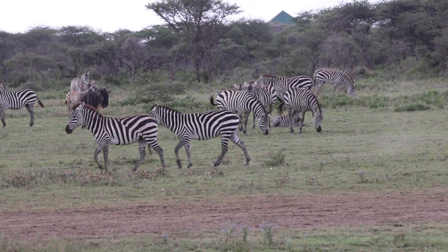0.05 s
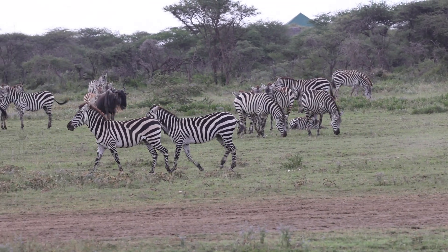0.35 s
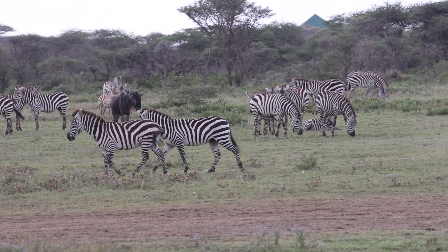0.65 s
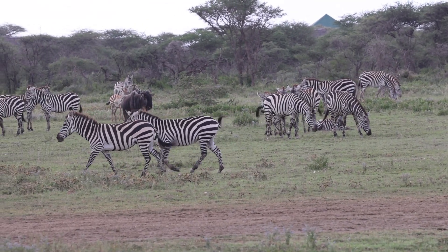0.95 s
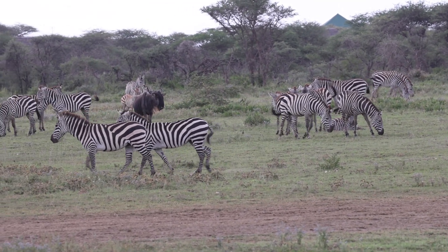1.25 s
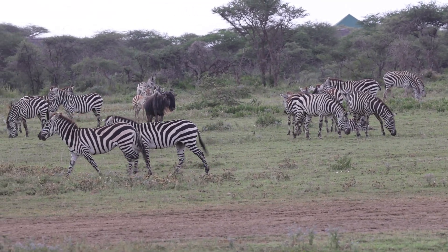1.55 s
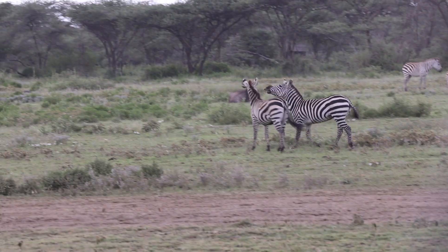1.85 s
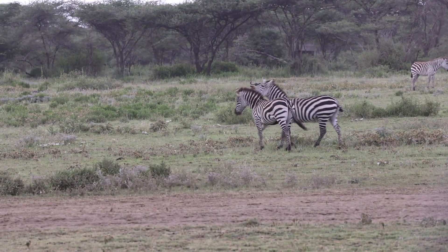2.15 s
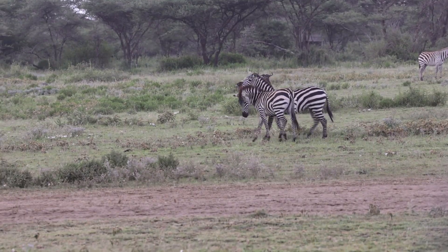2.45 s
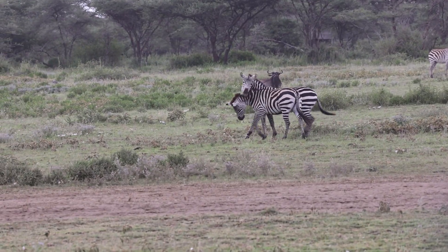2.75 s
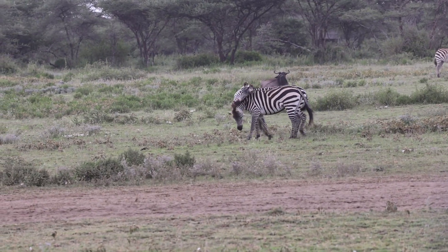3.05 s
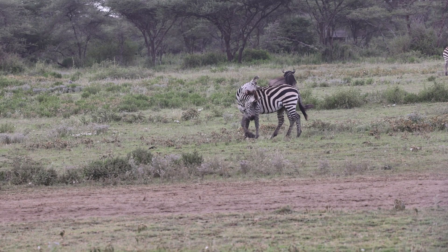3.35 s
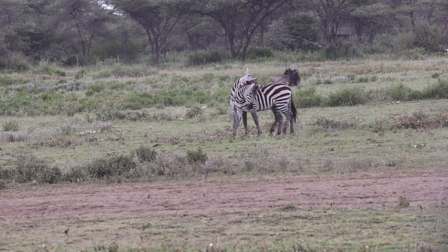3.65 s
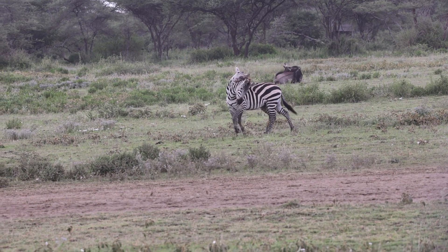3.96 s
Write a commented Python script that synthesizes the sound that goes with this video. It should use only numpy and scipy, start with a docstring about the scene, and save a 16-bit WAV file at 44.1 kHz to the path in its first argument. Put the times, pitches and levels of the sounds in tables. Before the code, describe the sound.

Zebras yelp in high, arching calls on open grassland while a bird trills.

```python
"""Open grassland, with animals calling from the bush, most likely birds. Mostly left of the microphone:
arched, whistle-clean yelps, soft level hoots and one thin squeal. To the right a bird sings a climbing
trill of quick upward chirps, two short whistles rise, and far birds twitter behind them.
The trees return a faint long echo over a very quiet bed of low rumble, hiss and hum."""
import sys
import numpy as np
from scipy import signal
from scipy.fft import rfft, irfft, next_fast_len
from scipy.io import wavfile
from scipy.ndimage import uniform_filter1d

SR = 44100
rng = np.random.default_rng(int(sys.argv[2]) if len(sys.argv) > 2 else 0)


def generate_wav(sig):
    """Save sig (samples, or channels by samples) to the path in sys.argv[1] as 16-bit PCM at SR."""
    pcm = np.round(np.clip(np.atleast_2d(sig).T, -1, 1) * 32767).astype(np.int16)
    wavfile.write(sys.argv[1], SR, pcm)


N = 176400

# One table per yelp. Each row: time in seconds, pitch in Hz, level in dB, level of the octave in dB.
YELP_CURVES = [
    [(0, 1672, -40, -47), (.04, 1647, -39, -54), (.09, 1535, -41.5, -70), (.13, 1400, -45.5, -61),
     (.15, 1230, -51, -83), (.167, 990, -64, -90)],
    [(.4, 980, -52.5, -82), (.414, 1107, -58.5, -72), (.425, 1476, -46.5, -55.5), (.45, 1652, -37.5, -48),
     (.512, 1694, -35, -50.5), (.56, 1580, -41, -57), (.615, 1458, -47, -73), (.664, 1292, -48, -60.5),
     (.692, 1184, -54, -78), (.708, 870, -65.5, -89)],
    [(1.635, 1067, -70, -87), (1.661, 1360, -63.5, -66.5), (1.71, 1527, -46.5, -47.5),
     (1.765, 1685, -34.5, -43.5), (1.83, 1711, -31, -42.5), (1.895, 1676, -34.5, -46),
     (1.95, 1586, -37, -46.5), (1.98, 1390, -47, -52.5), (2.0, 1080, -50, -82.5)],
    [(2.258, 1225, -54, -54), (2.273, 1388, -46, -45.5), (2.32, 1477, -36.5, -47), (2.36, 1406, -41.5, -47),
     (2.388, 1339, -45, -48)],
    [(2.388, 1738, -38.5, -48), (2.415, 1646, -36, -51.5), (2.45, 1448, -55.5, -66), (2.48, 1473, -48, -72),
     (2.52, 1370, -47, -77.5), (2.55, 1227, -49, -70), (2.565, 950, -73.5, -85)],
    [(2.847, 932, -61, -88), (2.866, 1111, -49.5, -66.5), (2.873, 1400, -49, -58.5),
     (2.91, 1651, -33.5, -41), (2.95, 1708, -32.5, -44.5), (3.0, 1560, -38, -55.5),
     (3.03, 1494, -44.5, -67), (3.075, 1473, -39, -62.5), (3.155, 1371, -43.5, -57.5),
     (3.162, 1080, -55.5, -70), (3.185, 958, -71, -78.5)],
    [(3.675, 1368, -60.5, -67.5), (3.705, 1522, -49.5, -67), (3.745, 1591, -45.5, -66),
     (3.8, 1562, -46.5, -72), (3.85, 1540, -47.5, -63), (3.875, 1330, -56.5, -61)],
]
YELP_PAN_DB = [3.3, 3, 3, 3.2, 3, 3, -3]  # one per yelp; every pan is left minus right
YELP_THIRD_DB = [-13, -19, -18.5, -18, -25, -19.5, -26]  # third harmonic against the octave, at 1700 Hz
# The trill. Each row: start in seconds, length in seconds, level in dB, top pitch in Hz.
TRILL_CHIRPS = [(2.429, 0.021, -45, 2530), (2.485, 0.023, -40.5, 2666), (2.538, 0.021, -40, 2827),
                (2.589, 0.024, -35, 2982), (2.639, 0.024, -33, 3093), (2.689, 0.026, -33.5, 3156),
                (2.739, 0.025, -30, 3228), (2.787, 0.03, -30, 3255), (2.838, 0.029, -29, 3320),
                (2.884, 0.034, -29.5, 3322), (2.935, .033, -28, 3340), (2.987, 0.029, -27.5, 3376),
                (3.038, .03, -27, 3420), (3.089, 0.032, -28, 3402), (3.142, 0.03, -26.5, 3442),
                (3.195, 0.031, -27, 3455), (3.247, 0.031, -26, 3458), (3.298, 0.035, -26.5, 3460),
                (3.354, 0.035, -27.5, 3417)]
# Branches near the singer. Each row: delay in seconds, level against the chirp in dB.
BRANCH_ECHOES = [(.006, -21.5), (.0135, -22), (.021, -20)]
# One table per hoot. Each row: time in seconds, pitch in Hz, level before scattering in dB.
HOOT_CURVES = [
    [(0, 1011, -63), (.42, 1020, -72.5)],
    [(1.66, 1250, -76), (1.732, 1212, -52), (1.824, 1210, -39), (1.9, 1204, -39.5), (1.996, 1204, -40),
     (2.07, 1210, -45.5), (2.16, 1216, -60), (2.19, 1180, -74)],
    [(2.18, 973, -70), (2.22, 998, -63), (2.3, 1010, -74), (2.39, 1007, -57), (2.52, 1014, -70)],
    [(3.62, 1192, -73.5), (3.712, 1209, -51), (3.802, 1202, -38.5), (3.87, 1196, -39), (4.0, 1203, -41)],
]
HOOT_PAN_DB, HOOT_OVERTONES_DB = [4, 3, 2.64, 2.8], [-36.5, -39, -43, -52, -40]
HOOT_SCATTER = [0.77, 0.02, 0.5, 0.024]  # share of each hoot that arrives scattered
# One table per rising whistle. Each row: time in seconds, pitch in Hz, level in dB.
SLUR_CURVES = [
    [(2.368, 1910, -57.5), (2.38, 2280, -48), (2.394, 2300, -50)],
    [(3.943, 1590, -64), (3.955, 1706, -39), (3.98, 1923, -36.5), (4.0, 2153, -29)],
]
SLUR_PAN_DB = [-5.5, -3]
# The squeal. Each row: time in seconds, pitch in Hz, base level in dB.
SQUEAL_CURVE = [(1.692, 730, -66.5), (1.705, 898, -62), (1.722, 995, -64), (1.757, 1084, -54),
                (1.785, 1113, -59.5), (1.837, 1154, -55.5), (1.85, 1160, -77)]
SQUEAL_HARMONICS_DB = [-25.5, -3, -0.5, 0.5, -10.5]  # against the base level, fundamental first
# One table per far phrase. Each row: time in seconds, centre pitch in Hz, level in dB.
TWITTER_CURVES = [
    [(0, 3000, -63), (.2, 3150, -70), (.45, 3264, -80), (.8, 3330, -89)],
    [(.3, 3224, -72), (.6, 3380, -64.5), (.92, 3520, -71.5), (1.2, 3500, -99)],
    [(3.4, 3840, -64.5), (3.6, 3884, -57.5), (3.8, 3844, -57), (4.0, 3784, -55.5)],
    [(3.4, 3550, -71), (4.0, 3613, -63)],
]
TWITTER_WIDTH_HZ = [940, 186, 200, 480]
# Spectrum of the open air. Each row: frequency in Hz, relative density in dB.
AIR_SPECTRUM = [(15, -26.5), (25, 3.5), (107, -8), (126, -7.5), (209, -13), (274, -14.5), (410, -15.5),
                (703, -14), (2170, -14), (3340, -18.5), (4150, -18.5), (15500, -21)]
# The air across the microphone. Each row: frequency in Hz, likeness of left and right from 0 to 1.
AIR_LIKENESS = [(100, .75), (250, .35), (600, .55), (1500, .9), (8000, .7), (12000, .93)]
# A faint hum. Each row: frequency in Hz, level in dB.
HUM_TONES = [(100, -79.5)]


def yelps():
    """Arched calls from the bush that leap up, round off and sag, with a trace of airy rasp."""
    out = np.zeros((2, N))
    for curve, pan_db, third_db in zip(YELP_CURVES, YELP_PAN_DB, YELP_THIRD_DB):
        start, (hz, db, octave_db) = glide(curve)
        bright_db = octave_db - db + 0.011 * (hz - 1700)  # upper harmonics dull as the pitch sags
        overtones_db = [octave_db - db, bright_db + third_db, bright_db - 33]
        tone = whistle(hz, db, overtones_db, jitter=0.003, shimmer_db=0.6)
        rasp = amp(octave_db - 26.5) * noise_band(np.full(len(hz), 3150), width_hz=2800)
        add(out, start, tone + rasp, pan_db)
    return out


def trill():
    """A bird on the right: twenty upward chirps a second, each beating against its branch echoes."""
    out = np.zeros((2, N))
    crest, droop = 0.72, 0.39  # share of the chirp spent climbing; weight of the fall after it
    for start, length, db, top_hz in TRILL_CHIRPS:
        progress = np.linspace(0, 1, round(length * SR))
        climb_hz = 690 - 0.28 * abs(top_hz - 3006)  # widest in the middle of the bird's range
        below_top = abs(1 - progress / crest) ** 1.66 * np.where(progress < crest, 1, droop)
        hz = top_hz - climb_hz * below_top
        swell = abs(np.sin(np.pi * progress ** 1.243)) ** 0.75  # slow rise, full top, quicker stop
        overtones = sum(amp(db - 47.5) * swell ** k * noise_band(k * hz, width_hz=240) for k in (2, 3))
        chirp = swell * whistle(hz, db, [], jitter=0.0033, shimmer_db=1.55, edge_s=0.0015) + overtones
        add(out, start, chirp, pan_db=-3)
        for delay, echo_db in BRANCH_ECHOES:
            add(out, start + delay, amp(echo_db) * chirp, pan_db=-3)
    return out


def hoots():
    """Far, flute-like hoots on the left: two clear and steady, two faint and wavering."""
    out = np.zeros((2, N))
    for curve, pan_db, share in zip(HOOT_CURVES, HOOT_PAN_DB, HOOT_SCATTER):
        start, (hz, db) = glide(curve)
        direct = whistle(hz, db, HOOT_OVERTONES_DB, jitter=0.0004, shimmer_db=0.44, edge_s=0.0017)
        scattered = amp(db) * noise_band(hz, width_hz=16)
        add(out, start, (1 - share) * direct + share * scattered, pan_db)
    return out


def slurs():
    """Short, raspy rising whistles to the right of the microphone."""
    out = np.zeros((2, N))
    for curve, pan_db in zip(SLUR_CURVES, SLUR_PAN_DB):
        start, (hz, db) = glide(curve)
        rasp = amp(db - 17) * noise_band(hz, width_hz=900)
        tone = whistle(hz, db, overtones_db=[-37], jitter=0.0046, shimmer_db=0.5)
        add(out, start, tone + rasp, pan_db)
    return out


def squeal():
    """A reedy rising note under the third yelp, almost all overtones, each with a rough edge."""
    out = np.zeros((2, N))
    start, (hz, db) = glide(SQUEAL_CURVE)
    for k, harmonic_db in enumerate(SQUEAL_HARMONICS_DB, 1):
        tone = whistle(k * hz, db + harmonic_db, [], jitter=0.0069, shimmer_db=1.5)
        rasp = amp(db + harmonic_db - 6) * noise_band(k * hz, width_hz=250)
        add(out, start, tone + rasp, pan_db=2)
    return out


def twitter():
    """Far birds on the right, their notes smeared by distance into a fluttering band."""
    out = np.zeros((2, N))
    for curve, width_hz in zip(TWITTER_CURVES, TWITTER_WIDTH_HZ):
        start, (hz, db) = glide(curve)
        flutter_db = 2 * wander(len(hz), rate_hz=35)
        level = amp(db + flutter_db) * signal.windows.tukey(len(hz), 0.04)
        add(out, start, level * noise_band(hz, width_hz), pan_db=-3)
    return out


def tree_echo(calls):
    """Sparse reflections from the trees, mostly from the caller's direction; the treble dies sooner."""
    low_t60_s, treble_t60_s, build_s = 1.41, 1.15, 0.011
    taps_per_s, spread, echo_db = 1500, 0.35, -20
    t = np.arange(2 * SR) / SR
    taps = rng.standard_normal((2, len(t))) * (rng.random((2, len(t))) < taps_per_s / SR)
    low = signal.sosfiltfilt(signal.butter(4, 2300, fs=SR, output="sos"), taps)
    decay = low * amp(-60 * t / low_t60_s) + (taps - low) * amp(-60 * t / treble_t60_s)
    mid, side = decay * (1 - np.exp(-t / build_s))
    tails = np.array([mid + spread * side, mid - spread * side]) / np.linalg.norm(mid)
    return amp(echo_db) * signal.fftconvolve(calls, tails, axes=1)[:, :N]


def background():
    """Soft rumble of moving air around the microphone, even hiss and a faint wavering hum."""
    hz, t = np.fft.rfftfreq(N, 1 / SR), np.arange(N) / SR
    left, unrelated = rfft(rng.standard_normal((2, N))) * amp(at_frequency(AIR_SPECTRUM, hz))
    likeness = at_frequency(AIR_LIKENESS, hz)
    right = likeness * left + np.sqrt(1 - likeness ** 2) * unrelated
    air = amp(-67) * unit_rms(irfft(np.array([left, right]), N))
    hum = sum(amp(db) * unit_rms(np.sin(2 * np.pi * hum_hz * t + 0.86 * wander(N, rate_hz=9.5)))
              for hum_hz, db in HUM_TONES)
    return air + hum


def whistle(hz, db, overtones_db, jitter, shimmer_db, edge_s=0.0025):
    """A tone trembling slightly in pitch and level; overtones count from the second harmonic."""
    n = len(hz)
    phase = 2 * np.pi * np.cumsum(hz * (1 + jitter * wander(n, rate_hz=180))) / SR
    tone = np.sin(phase) + sum(amp(level) * np.sin(k * phase) for k, level in enumerate(overtones_db, 2))
    fade = np.minimum(np.arange(n) / SR / edge_s, 1)
    return np.sqrt(2) * tone * amp(db + shimmer_db * wander(n, rate_hz=65)) * fade * fade[::-1]


def noise_band(hz, width_hz):
    """A band of noise, rms about 1, that follows a pitch curve."""
    phase, n = 2 * np.pi * np.cumsum(hz) / SR, len(hz)
    return wander(n, width_hz) * np.cos(phase) + wander(n, width_hz) * np.sin(phase)


def glide(curve, rounding_s=0.0087):
    """A call's start time and its other columns, joined sample by sample with rounded corners."""
    times, *columns = np.transpose(curve)
    t = np.arange(times[0], times[-1], 1 / SR)
    lines = [np.interp(t, times, column) for column in columns]
    for _ in range(2):
        lines = uniform_filter1d(lines, round(rounding_s * SR), mode="nearest")
    return times[0], lines


def wander(size, rate_hz):
    """Smooth random motion, rms about 1."""
    n = next_fast_len(max(size, SR // 2))
    lowpass = np.exp(-(np.fft.rfftfreq(n, 1 / SR) / rate_hz) ** 2)
    return unit_rms(irfft(rfft(rng.standard_normal(n)) * lowpass, n))[:size]


def add(mix, start_s, sound, pan_db):
    """Places a sound in time and between left and right."""
    part = mix[:, round(start_s * SR):][:, :len(sound)]
    sides = amp([[pan_db / 2], [-pan_db / 2]])
    part += sides / sides.mean() * sound[:part.shape[1]]


def at_frequency(table, hz):
    """A table's values joined along a logarithmic frequency axis."""
    table_hz, values = np.transpose(table)
    return np.interp(np.log(hz + 1), np.log(table_hz + 1), values)


def amp(db):
    return 10 ** (np.asarray(db) / 20)


def unit_rms(x):
    return x / np.sqrt(np.mean(x ** 2) + 1e-20)


def scene():
    """At the microphone: the calls, their echo off the trees, far birds and the air."""
    calls = yelps() + hoots() + slurs() + squeal() + trill()
    return calls + tree_echo(calls) + twitter() + background()


def record(dry):
    """The recorder's band limit cuts the highest treble."""
    lowpass = signal.firwin(511, cutoff=15550, window=("kaiser", 9), fs=SR)
    return signal.oaconvolve(dry, lowpass[None], "same")


dry = scene()
out = record(dry)
generate_wav(out)
```